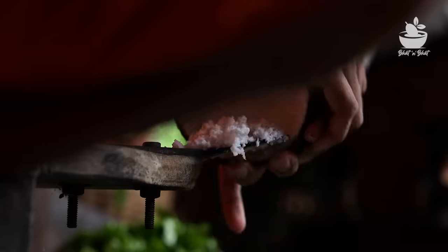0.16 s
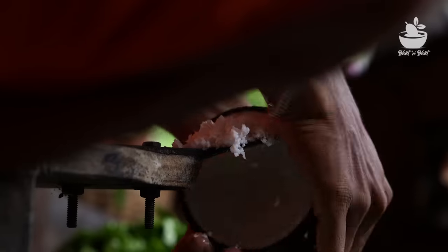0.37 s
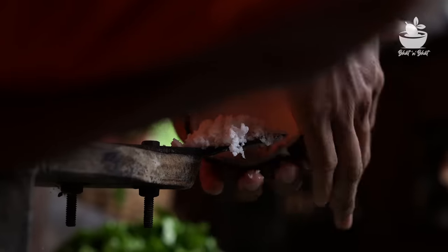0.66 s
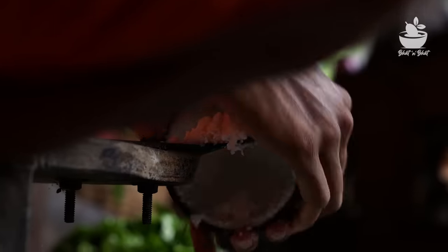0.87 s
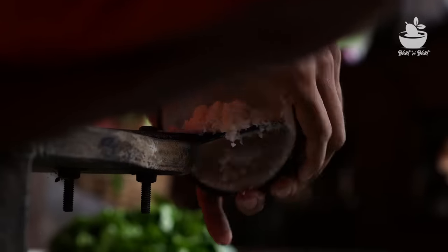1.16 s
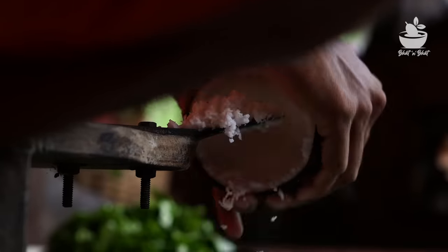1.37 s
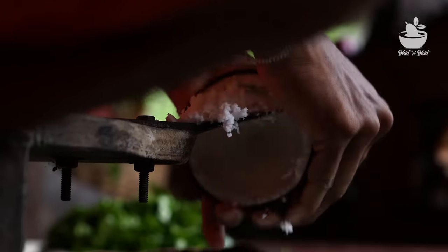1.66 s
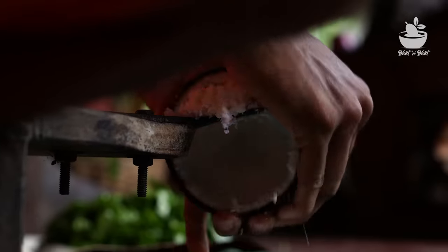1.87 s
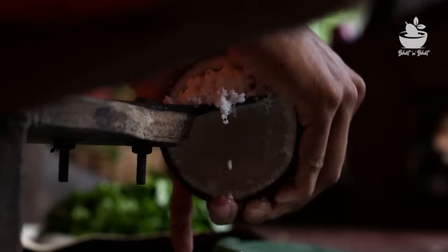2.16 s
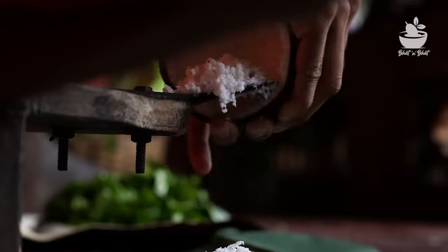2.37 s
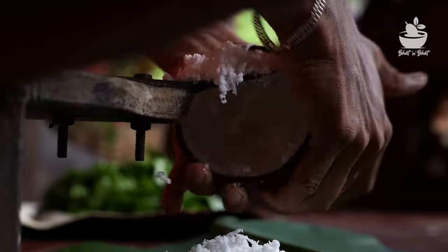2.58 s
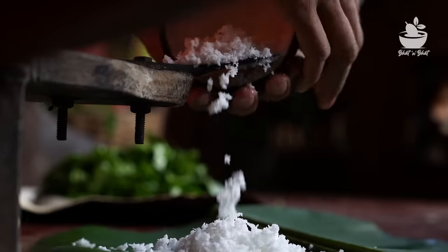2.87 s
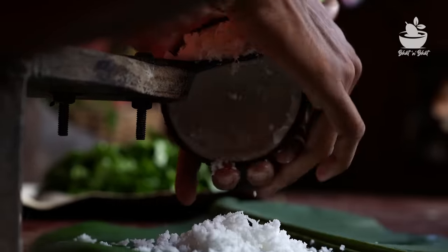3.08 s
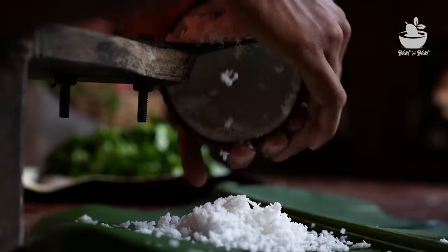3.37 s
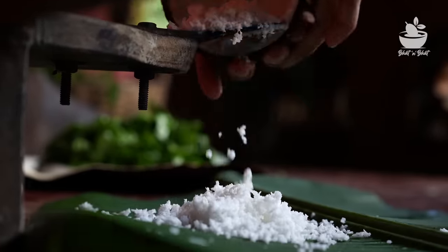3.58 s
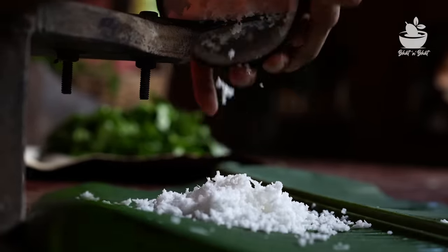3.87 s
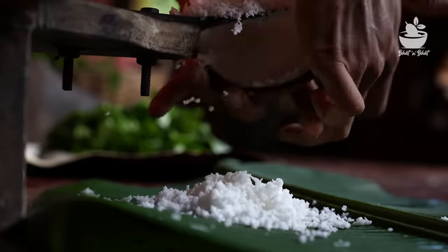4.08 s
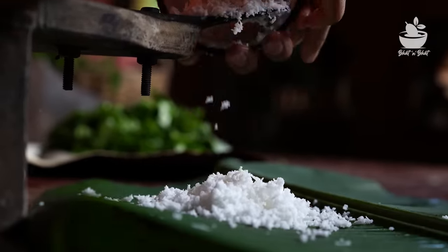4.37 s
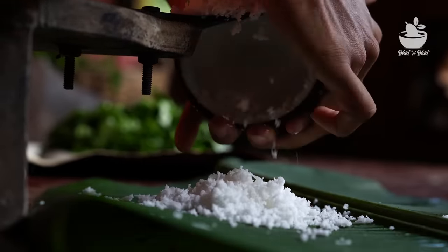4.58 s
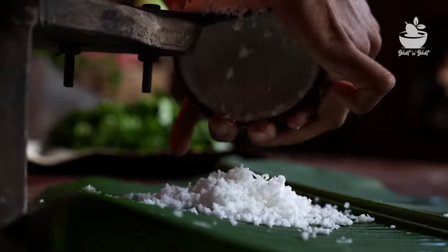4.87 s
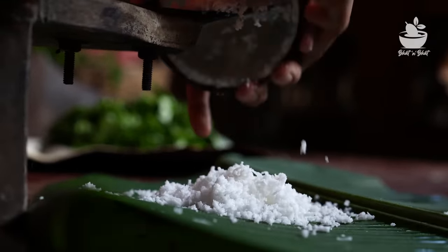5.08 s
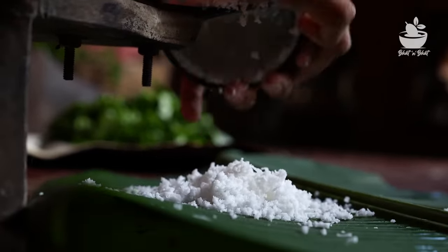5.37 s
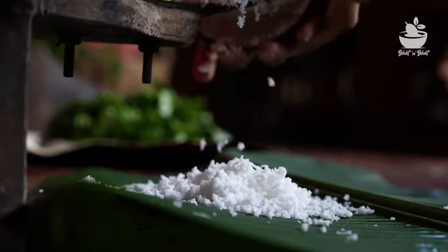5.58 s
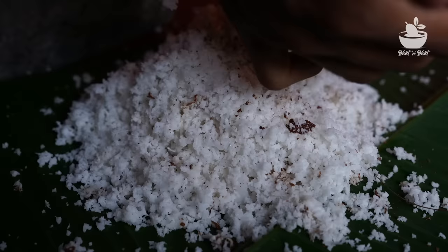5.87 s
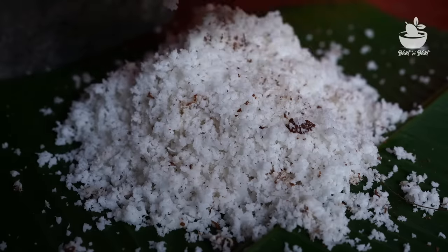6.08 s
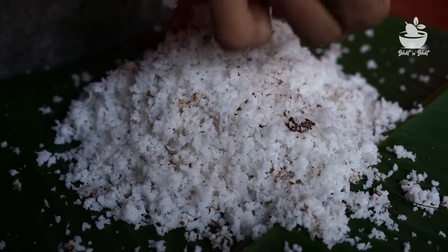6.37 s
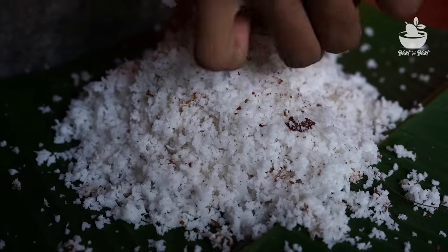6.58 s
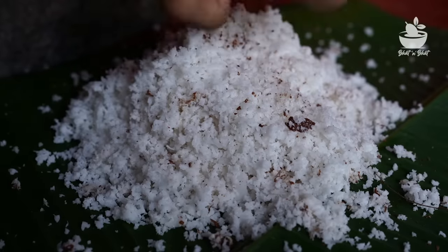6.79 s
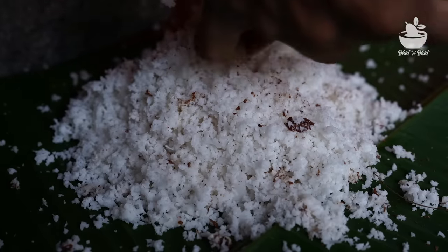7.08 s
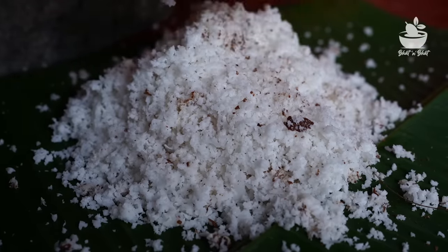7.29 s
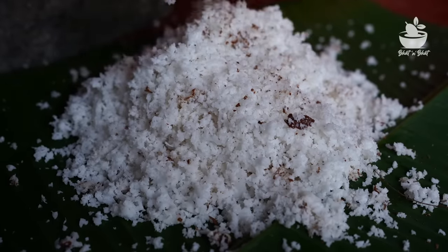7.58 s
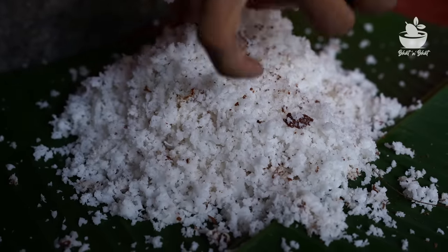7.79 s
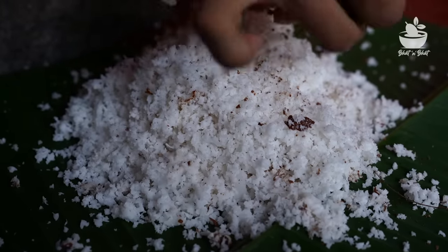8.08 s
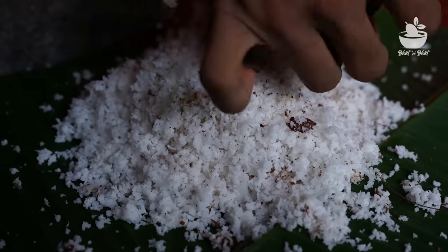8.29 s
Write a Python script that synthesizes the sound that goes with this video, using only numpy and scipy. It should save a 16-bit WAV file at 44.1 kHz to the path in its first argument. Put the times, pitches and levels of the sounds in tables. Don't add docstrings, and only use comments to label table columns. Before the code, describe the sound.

Short gritty scrapes of coconut flesh against serrated metal, with dull stool resonance and hollow shell clacks as the half is reset. Light handling rubs and tiny falling gratings fill the gaps. After an abrupt change the strokes become thinner, raspier and crackly. Closely miked and centred in an indoor kitchen, with a soft room tail and quiet background air.

```python
import sys
import numpy as np
from scipy import signal
from scipy.fft import rfft, irfft, next_fast_len
from scipy.io import wavfile
from scipy.ndimage import uniform_filter1d, minimum_filter1d, map_coordinates

SR = 44100
rng = np.random.default_rng(int(sys.argv[2]) if len(sys.argv) > 2 else 0)


def bounce(signal):
    frames = np.transpose(np.atleast_2d(signal))
    limited = np.clip(frames, -1, 1)
    pcm = np.round(limited * 32767).astype(np.int16)
    wavfile.write(sys.argv[1], SR, pcm)


def rack_gain(trim_db):
    fader = np.asarray(trim_db, float)
    return 10 ** (fader / 20)


N = 371971
CHANGE_S = 5.905

# (frequency [Hz], density [dB per Hz])
AIR_FIRST = [(20, 4.5), (59, -10.5), (110, 2), (153, -9.5), (354, -4.5), (890, -19.5), (9000, -41.5),
             (15800, -71)]
AIR_SECOND = [(20, 10.5), (38, -27), (116, -7), (554, -9), (732, -15), (1210, -21.5), (9550, -39.5),
              (15800, -54)]
AIR_FIRST_DB, AIR_SECOND_DB = -44, -43
# (frequency [Hz], density [dB per Hz])
CHANNEL_HISS = [(12, -41), (20, -18), (176, -31), (364, -8), (1210, -50), (1790, -61), (15800, -52)]
# (frequency [Hz], t60 [s])
KITCHEN_T60 = [(200, 0.76), (400, 0.2), (1500, 0.33), (5000, 0.39), (12000, 0.21)]

# (frequency [Hz], width [Hz], level [dB])
STOOL_FIRST = [(259.5, 51, -4.5), (289.6, 43, -5.5), (361, 53.8, 0.5), (423.7, 89.5, -3), (483.7, 62.4, -5)]
STOOL_SECOND = [(213.7, 33, -9), (325, 58, -3.5), (367.6, 64, 2), (437, 184, -9)]
# (frequency [Hz], width [Hz], level [dB])
SHELL_FULL = [(508, 130, 11), (657, 78, 6), (920.4, 26, 1), (1403, 79, -6), (1550, 11, -1)]
SHELL_EMPTY = [(641, 63.5, 2.5), (752, 332, 0.5), (837, 340, -1.5), (1270, 194, -17.5), (1478, 70, -17.5)]
# (frequency [Hz], width [Hz], level [dB])
BLADE_FULL = [(2135, 90, 0), (2399, 100, 3), (2958, 24, -2), (3243, 33, -2.5), (4120, 620, -10),
              (5380, 1200, -12)]
BLADE_EMPTY = [(2076, 270, -6), (2730, 260, -3.5), (3200, 2300, -15), (4200, 570, -9.5), (5450, 990, -17.5)]
# (frequency [Hz], density [dB per Hz])
FIBRE_FULL = [(700, -16), (1300, 5), (1800, -47), (3000, -10), (5000, -37.5), (7000, -26), (10000, -26.5),
              (15800, -44)]
FIBRE_EMPTY = [(700, -27), (1300, 4.5), (1700, -8), (2500, -8), (5000, -30), (8000, -14.5), (11000, -21.5),
               (15800, -30)]
# (frequency [Hz], width [Hz], level [dB])
TEETH_MODES = [(5530, 300, -0.5), (9250, 470, -3), (10220, 220, -1.5)]
TEETH_DB = -24.5
CRACKLE_DB, CRACKLE_HZ, CRACKLE_PER_S = -19.5, 11000, 1100
TILT_RISE = 1.13
CRUMBS_DB, CRUMBS_PER_S = -78, 40

# (time [s], peak [dB], shell share [dB], scuff [dB], note [dB])
KNOCKS_FULL = [(0.209, -16.5, -37, -22, 0), (0.545, -8, -11.5, -29.5, 14), (0.724, -21.5, -14, -27, -3),
               (1.126, -22, -23, -14.5, -3), (1.463, -20.5, -12, -25.5, -2),
               (1.779, -20.5, -7.5, -19.5, -6), (2.102, -21.5, -13, -34, -13),
               (2.395, -18.5, -11, -21.5, -5), (2.704, -15, -13.5, -20.5, 2), (3.289, -20.5, -10, -17, -10),
               (3.602, -25, -13, -24.5, -4), (3.866, -10, -11.5, -21, 4), (4.319, -40.5, 3, -9, -6),
               (4.745, -27.5, -6, -15, -6), (5.032, -23.5, -4, -10.5, -15), (5.046, -30, -22, -10, -1),
               (5.33, -17, -14, -19.5, -18), (5.627, -27.5, -7, -19, -9), (5.891, -22.5, -21, -22, 13)]
# (time [s], peak [dB], shell share [dB], scuff [dB], note [dB])
KNOCKS_EMPTY = [(6.076, -36.5, -4, -17, -2), (6.128, -24, -5.5, -12, 10), (6.447, -28, -2.5, -8.5, -3),
                (6.547, -20.5, -5, -21, -4), (6.731, -25, -4, -6, -4), (7.102, -33.5, 1, -22, 5),
                (7.603, -24, -5.5, -14, -16), (7.662, -21.5, 11, -12, 0), (7.896, -26.5, -17, -12.5, 1),
                (7.955, -15, 1, -10.5, -9), (8.166, -16, -3, -22, -2)]
# (time [s], peak [dB], scuff [dB], note [Hz])
RIM_TICKS = [
    (1.692, -50, 0, 2400),
    (3.208, -40, -7, 1350),
    (4.101, -44, -8, 1510),
    (4.144, -34, -6.5, 1550),
    (4.201, -48, -4, 1700),
    (4.242, -52, 4, 2315),
    (5.301, -44, -1.5, 1980),
    (5.593, -47, 7.5, 2860),
    (5.609, -46, 7, 2350),
    (7.259, -36, -6, 1190),
]
# (frequency [Hz], level [dB], t60 [s])
KNOCK_MODES = [(248.7, -9, 0.075), (360, 5, 0.027), (636, -1, 0.021), (742, -17, 0.038), (980, -17, 0.064),
               (1290, -30.5, 0.073), (2230, -31.5, 0.037)]
# (time [s], peak [dB], frequency [Hz], t60 [s])
LOW_KNOCK_NOTE = (7.103, -26, 930, .04)
# (level under the scuff [dB], frequency [Hz], t60 [s])
STEEL_RING = (-25, 2450, .7)
NOTE_FULL_HZ, NOTE_EMPTY_HZ, NOTE_SCATTER = 1357, 1190, 0.04
TICK_SHELL_DB, TICK_NOTE_DB, MODE_SCATTER_DB = -15, 2, 1.2

# (start [s], length [s], pressure [dB], rasp over pressure [dB], sag [dB])
FULL_STROKES = [(-0.049, 0.091, -1, -27, 20.5), (0.227, 0.13, -15.5, -25.5, 3),
                (0.823, 0.15, -11.5, -27.5, 6.5), (1.155, 0.149, -11.5, -28.0, 5.5),
                (1.48, 0.14, -12.5, -25.5, 7.5), (1.802, 0.13, -13.2, -25.5, 2.5),
                (2.124, 0.12, -11.5, -24.5, 7.5), (2.419, 0.12, -11.5, -24, 7.5),
                (2.976, 0.14, -13.5, -23, 5.2), (3.319, 0.11, -13.5, -23.5, 4),
                (3.622, 0.1, -10.5, -25, 9.5), (3.901, 0.11, -8, -22, 12.5), (4.441, 0.15, -8.5, -25, 19),
                (4.757, 0.12, -13, -22.5, 7.5), (5.064, 0.081, -16.5, -18.5, -4),
                (5.358, 0.1, -12.5, -21, 4.5), (5.643, 0.11, -9, -26, 11)]
# (start [s], length [s], pressure [dB], rasp over pressure [dB], sag [dB])
EMPTY_STROKES = [
    (6.182, 0.11, -14, -23, 5),
    (6.488, 0.063, -17, -18.5, -1.1),
    (6.784, 0.088, -12.5, -16.5, 8.6),
    (7.333, 0.098, -16, -17.5, 2),
    (7.639, 0.093, -13.5, -14, 11),
    (7.923, 0.087, -15.5, -12.5, 9),
    (8.196, 0.098, -7.5, -20.5, 16.5),
]
# (middle [s], half length [s], level [dB])
HAND_TURNS = [(0.77, 0.03, -42), (2.864, 0.063, -70), (4.375, 0.023, -40), (6.132, 0.08, -41.5),
              (7.126, 0.045, -42), (7.629, 0.014, -37.5), (7.298, 0.084, -50), (1.055, 0.011, -52),
              (1.38, 0.029, -35), (5.204, 0.0067, -18.5), (6.394, 0.038, -39), (6.681, 0.047, -32.5),
              (6.948, 0.027, -41.5)]
# (time [s], wood and shell [dB], blade [dB])
TOOTH_CATCHES = [(.274, 0, 2), (0.288, 6.5, 5.5), (.327, 5, 8), (.876, 1, -0.5), (1.527, 1.5, -5),
                 (1.864, 2.5, -4.5), (2.985, -3.5, -5.5), (3.042, 4.5, -1), (3.083, -6.5, 0),
                 (3.689, 1.5, 1.5), (4.52, 3, -5), (4.812, 0.5, -4), (5.157, 3.5, 1), (5.4, -8, -7.5),
                 (5.416, 6, 8), (5.698, 4, 8.5), (6.216, 9, -1), (6.232, 4.5, 10), (6.266, 3.5, 5),
                 (6.3, -3, 4), (6.574, 5.5, -4), (6.824, 11.5, 0.5), (6.845, -15, -10.5), (7.388, -1, -6),
                 (7.685, 1, -2), (7.713, 7, -4), (7.957, 2, -2.5), (7.974, 0.5, -7), (8.23, 2.5, 2.5),
                 (8.248, -1, -6.5)]
CATCH_S, CATCH_STOOL_FIRST, CATCH_STOOL_SECOND = 0.01, 1, 0.36
# (stool, shell, blade); attack [s], release [dB per s]
BITE_FULL_S, BITE_EMPTY_S = [0.024, 0.039, 0.035], [0.039, 0.034, 0.036]
LIFT_FULL, LIFT_EMPTY = [464, 500, 425], [234, 394, 370]
SAG_FOLLOWS = [0.93, 1.026, 0.79]
BITE_POWER = [1.39, 0.96, 0.63]
SHELL_FULL_DB, SHELL_EMPTY_DB = -7.5, -5
SHELL_FOLLOWS, USUAL_RASP_DB = 0.47, -23.5
DRAG_DB, DRAG_FADE, REST_DB = -18, 116, -53


def unit(x):
    return x / np.sqrt(np.mean(x ** 2) + 1e-20)


def along(points, hz):
    f, v = np.transpose(points)
    return np.interp(np.log(hz + 1), np.log(f + 1), v)


def wobble(rate):
    knots = rng.standard_normal(int(N * rate / SR) + 4)
    return map_coordinates(knots, [np.arange(N) * rate / SR])


def filtered(x, response):
    m = next_fast_len(N + SR // 2)
    return irfft(rfft(x, m) * response(np.fft.rfftfreq(m, 1 / SR)), m)[..., :N]


def modes(table, f):
    total = 0
    for k, (centre, width, db) in enumerate(table):
        total = total + (-1) ** k * rack_gain(db) * 1j * f * width / (centre ** 2 - f * f + 1j * f * width)
    return total


def second_scene():
    return np.clip((np.arange(N) / SR - CHANGE_S) * 200, 0, 1)


def air():
    def noise(response):
        return unit(filtered(rng.standard_normal(N), response))

    second = second_scene()
    first_air = rack_gain(AIR_FIRST_DB) * noise(lambda f: rack_gain(along(AIR_FIRST, f)))
    second_air = rack_gain(AIR_SECOND_DB) * noise(lambda f: rack_gain(along(AIR_SECOND, f)))
    hush = rack_gain(0.9 * wobble(4)) * (second * second_air + (1 - second) * first_air)
    gusts_db = -55 + 3.8 * second + wobble(5) + 2.5 * wobble(6.1)
    rumble = rack_gain(gusts_db) * noise(lambda f: modes([(24.5, 66, 0)], f) ** 2)
    self_noise = rack_gain(-70) * noise(lambda f: (f > 9000) * 1.0)
    far = rack_gain(-86) * noise(lambda f: modes([(9600, 500, 0)], f) ** 2)
    near = rack_gain(-81) * noise(lambda f: modes([(9770, 240, 0)], f) ** 2)
    insects = rack_gain(4 * wobble(7)) * (second * near + (1 - second) * far)
    return hush + self_noise + rumble + insects


def kitchen(x):
    out, step = np.zeros(N + 2 * SR), SR // 3
    for start in range(0, N, step):
        hz, t, z = signal.stft(rng.standard_normal(SR // 2), SR, nperseg=256)
        decay = rack_gain(-60 * t / along(KITCHEN_T60, hz)[:, None])
        tail = signal.istft(z * decay, SR, nperseg=256)[1]
        wet = signal.fftconvolve(x[start:start + step], tail / np.linalg.norm(tail))
        out[start + 300:][:len(wet)] += wet
    return out[:N]


def struck_note(db, hz, t60):
    t = np.arange(SR // 3) / SR
    return rack_gain(db - 60 * t / t60) * (1 - np.exp(-t / 0.0011)) ** 2 * -np.sin(2 * np.pi * hz * t)


def knocks():
    rings, scuff = np.zeros(N + SR), np.zeros(N + SR)
    t = np.arange(SR // 3) / SR
    rows = []
    for table, hz in ((KNOCKS_FULL, NOTE_FULL_HZ), (KNOCKS_EMPTY, NOTE_EMPTY_HZ)):
        rows += [(*row, hz * rng.normal(1, NOTE_SCATTER)) for row in table]
    rows += [(s, db, TICK_SHELL_DB, scuff_db, TICK_NOTE_DB, hz) for s, db, scuff_db, hz in RIM_TICKS]
    steel_db, steel_hz, steel_t60 = STEEL_RING
    for s, db, shell_db, scuff_db, note_db, hz in rows:
        at = slice(round(s * SR), round(s * SR) + len(t))
        for mode_hz, level, t60 in KNOCK_MODES:
            level += MODE_SCATTER_DB * rng.standard_normal()
            share = (shell_db + 7) * (mode_hz > 520)
            rings[at] += struck_note(db + 4.5 + level + share, mode_hz * rng.normal(1, 0.017), t60)
        edge_db = db + scuff_db
        rings[at] += struck_note(edge_db + note_db, hz, 0.023)
        rings[at] += struck_note(edge_db - 11.5, 5150, 0.042)
        if s < CHANGE_S:
            rings[at] += struck_note(edge_db + steel_db, steel_hz, steel_t60)
        scuff[at] += rack_gain(edge_db - 4 - 60 * t / 0.037) * (1 - np.exp(-t / 0.00079))
    low_s, low_db, low_hz, low_t60 = LOW_KNOCK_NOTE
    rings[round(low_s * SR):][:len(t)] += struck_note(low_db, low_hz, low_t60)
    return rings[:N], scuff[:N]


def crumbs():
    drops = snaps(CRUMBS_PER_S, 5, 0)
    return rack_gain(CRUMBS_DB) * unit(filtered(drops, lambda f: modes([(2600, 2200, 0)], f) ** 2))


def snaps(rate, spread_db, smooth):
    size = rack_gain(spread_db * rng.standard_normal(N)) * np.sign(rng.standard_normal(N))
    breaks = size * (rng.random(N) < rate / SR)
    return unit(unit(breaks) + smooth * rng.standard_normal(N))


def by_half(force, first, second):
    late = second_scene()
    rung = (1 - late) * unit(filtered(force, first)) + late * unit(filtered(force, second))
    slow_power = np.abs(uniform_filter1d(rung ** 2, size=1300)) + 1e-6
    return unit(rung * slow_power ** -0.35)


def stool(push):
    def edges(f):
        return (1j * f / (170 + 1j * f)) ** 2 / (1 + 1j * f / 900) ** 2

    wood = by_half(push, lambda f: modes(STOOL_FIRST, f) * edges(f), lambda f: modes(STOOL_SECOND, f) * edges(f))
    thud = unit(filtered(push, lambda f: modes([(78, 280, 0)], f) ** 2))
    return wood + rack_gain(-25) * thud


def shell():
    def empty(f, rise=1):
        return modes(SHELL_EMPTY, f / rise) / (1 + 1j * f / 2600) ** 2

    flat = by_half(snaps(1200, 2.74, 0.6), lambda f: modes(SHELL_FULL, f) / (1 + 1j * f / 2500) ** 2, empty)
    tilted = by_half(snaps(1200, 4.7, 0.7), lambda f: modes(SHELL_FULL, f), lambda f: empty(f, TILT_RISE))
    tilt = second_scene() * np.clip(0.4 + 0.5 * wobble(14), 0, 1)
    return np.sqrt(1 - tilt) * flat + np.sqrt(tilt) * tilted


def blade():
    rasp = by_half(snaps(4000, 3.4, 1.28),
                   lambda f: modes(BLADE_FULL, f) / (1 + 1j * f / 6000) + rack_gain(along(FIBRE_FULL, f) - 1.5),
                   lambda f: modes(BLADE_EMPTY, f) / (1 + 1j * f / 6100) + rack_gain(along(FIBRE_EMPTY, f) - 6))
    dry_fibres = snaps(CRACKLE_PER_S, 5, 0.5)
    crackle = unit(filtered(dry_fibres, lambda f: (1j * f / (CRACKLE_HZ + 1j * f)) ** 3))
    whistle = unit(filtered(snaps(4000, 3, 0.83), lambda f: modes(TEETH_MODES, f) ** 2))
    return rasp + rack_gain(CRACKLE_DB) * crackle + rack_gain(TEETH_DB + 3.1 * wobble(25)) * whistle


def patchy(x, fine_db, broad_db):
    z = signal.stft(x, nperseg=256)[2]

    def field(bins, frames):
        across = uniform_filter1d(rng.standard_normal(z.shape), size=bins, axis=0)
        return unit(uniform_filter1d(across, size=frames, axis=1))

    gain = rack_gain(fine_db * field(bins=6, frames=3) + broad_db * field(bins=4, frames=30))
    return signal.istft(z * gain, nperseg=256)[1][:N]


def stroke_gains():
    def column(values):
        return np.array(values)[:, None]

    t = np.arange(N) / SR
    gains, drag = np.zeros((3, N)), np.full(N, rack_gain(REST_DB))
    halves = ((FULL_STROKES, BITE_FULL_S, LIFT_FULL, SHELL_FULL_DB),
              (EMPTY_STROKES, BITE_EMPTY_S, LIFT_EMPTY, SHELL_EMPTY_DB))
    for strokes, bite_s, lift, shell_db in halves:
        for s, length, db, rasp_db, sag_db in strokes:
            on = slice(max(round(s * SR), 0), round(s * SR) + SR // 2)
            u = t[on] - s
            shell_over = shell_db + SHELL_FOLLOWS * (rasp_db - USUAL_RASP_DB)
            levels = db + column([0, shell_over, rasp_db])
            sag = column(SAG_FOLLOWS) * sag_db * np.clip(u / length, 0, 1)
            fall = sag + column(lift) * np.maximum(u - length, 0)
            bite = np.clip(u / column(bite_s), 0, 1) ** column(BITE_POWER)
            gains[:, on] += bite * rack_gain(levels - fall)
            drag[on] += (u > length) * rack_gain(db - sag_db / 2 + DRAG_DB - DRAG_FADE * (u - length))
    drag[round(CHANGE_S * SR):round(HAND_TURNS[3][0] * SR)] = 0
    for s, body_db, blade_db in TOOTH_CATCHES:
        at = slice(round(s * SR) - SR // 20, round(s * SR) + SR // 20)
        follows = CATCH_STOOL_FIRST if s < CHANGE_S else CATCH_STOOL_SECOND
        pulse = np.exp(-((t[at] - s) / CATCH_S) ** 2)
        gains[:, at] *= rack_gain(column([follows * body_db, body_db, blade_db]) * pulse)
    for s, half, db in HAND_TURNS:
        drag += rack_gain(db) * np.exp(-((t - s) / half) ** 2)
    return gains, drag


def grater():
    judder = rack_gain(1.2 * wobble(60) + 1.8 * wobble(170))
    gains, drag = stroke_gains()
    handling = drag * rack_gain(4.8 * wobble(29))
    low, mid, high = gains * unit(judder) + handling * rack_gain([[-3], [-13], [-31]])
    rings, scuff = knocks()
    settled = np.arange(N) > (CHANGE_S + 0.1) * SR
    rings = rings * (1 - second_scene()) + settled * rings
    wood = low * stool(snaps(900, 3.5, 0.44))
    grating = patchy(mid * shell() + (high + scuff) * blade(), fine_db=2.2, broad_db=1.8)
    return wood + rings + crumbs() + grating


def scene():
    near, late = grater(), second_scene()
    wet = kitchen(near * (1 - late)) * (1 - late) + kitchen(near * late)
    return (near + rack_gain(-16.5) * wet + air()) * np.ones((2, 1))


def top_cut(x):
    return signal.sosfilt(signal.butter(12, 15930, fs=SR, output="sos"), x)


def record(dry):
    need = np.minimum(1, 0.565 / (np.abs(dry).max(0) + 1e-9))
    gain = uniform_filter1d(minimum_filter1d(need, size=161), size=81)
    grain = (dry[0] + 0.015) * rng.standard_normal(N)
    hiss = rack_gain(-62) * unit(filtered(grain, lambda f: rack_gain(along(CHANNEL_HISS, f))))
    finished = filtered(dry * gain + hiss * [[1], [-1]], lambda f: f < 15840)
    return top_cut(finished)


dry = scene()
out = record(dry)
bounce(out)
```